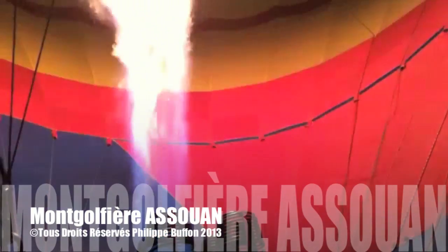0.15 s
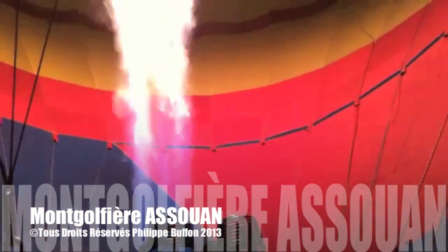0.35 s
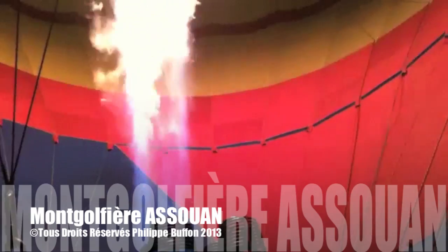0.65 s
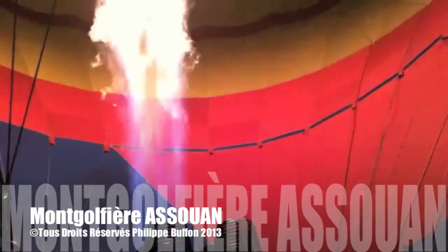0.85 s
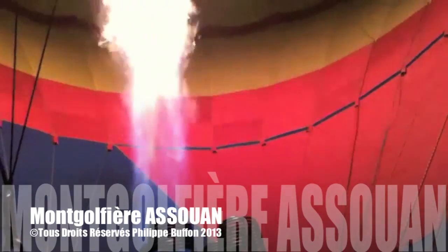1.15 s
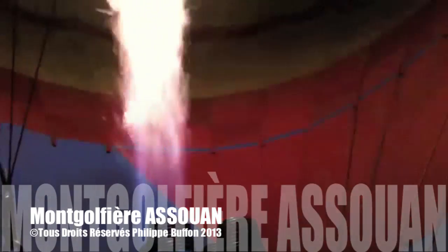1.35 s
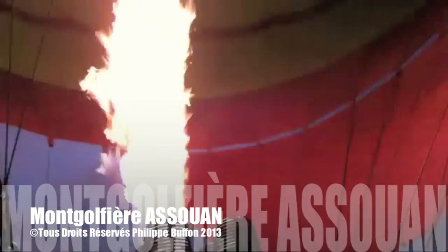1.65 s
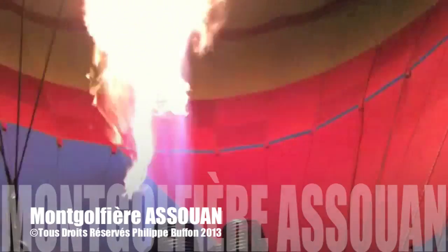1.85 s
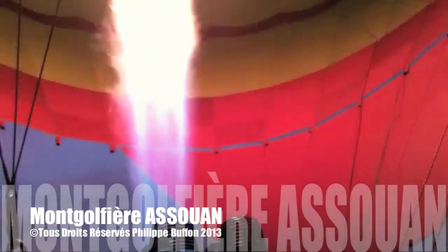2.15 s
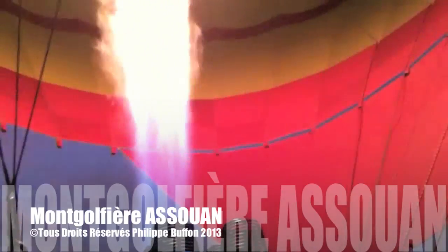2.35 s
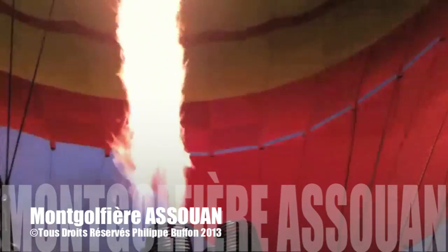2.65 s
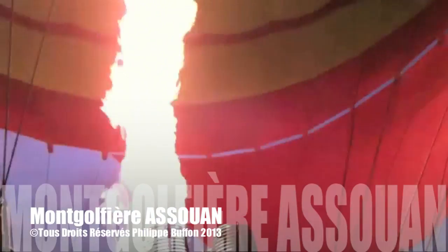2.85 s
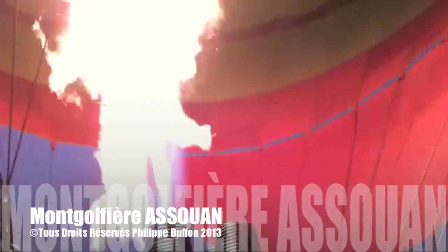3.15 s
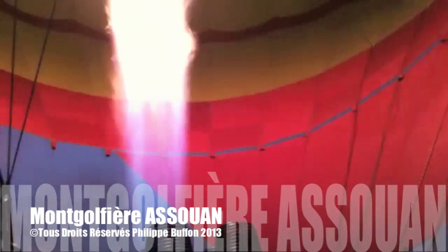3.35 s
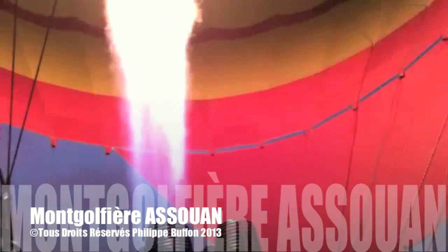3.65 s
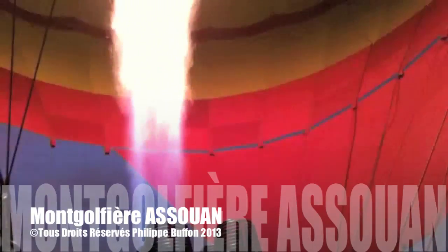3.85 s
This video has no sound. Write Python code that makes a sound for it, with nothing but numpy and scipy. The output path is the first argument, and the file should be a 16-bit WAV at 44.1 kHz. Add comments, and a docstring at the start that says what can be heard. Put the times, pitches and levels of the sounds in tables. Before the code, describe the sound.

Three long bursts of hissing gas and rushing, roaring flame from a balloon burner, each dying away with a short echo.

```python
"""In the basket of a hot air balloon, a propane burner fires three long blasts just overhead.
Gas hisses from the nozzles, the jets rush as they mix with air, and the flame roars as it burns unevenly.
Now and then a pocket of gas flares up with a puff. Between blasts the gas line empties,
the air inside the balloon rings on, and a lazy pilot flame keeps burning."""
import sys
import numpy as np
from scipy import signal
from scipy.fft import rfft, irfft, next_fast_len
from scipy.io import wavfile
from scipy.ndimage import uniform_filter1d

SR = 44100
rng = np.random.default_rng(int(sys.argv[2]) if len(sys.argv) > 2 else 0)


def generate_wav(sig):
    """Save sig (samples, or channels by samples) to the path in sys.argv[1] as 16-bit PCM at SR."""
    pcm = np.round(np.clip(np.atleast_2d(sig).T, -1, 1) * 32767).astype(np.int16)
    wavfile.write(sys.argv[1], SR, pcm)


N = 177326
TIME = np.arange(N) / SR

# Pulls on the gas valve; the first is already under way. Each sound adds its own trim to these levels.
# open_s, ease_s, shut_s, emptying_db_per_s, hiss_db, rush_db, roar_db
BLASTS = [(-0.22, 1.08, 1.344, 74, -20.5, -21, -19), (1.701, 2.18, 2.528, 88, -22.5, -20, -20),
          (3.004, 3.602, 3.923, 64, -21.5, -20.2, -19.5)]
# The tone of each noise, from low to high: pitch_hz, relative_level_db
HISS_TONE = [(1900, -29), (3200, -14), (3650, -8), (4250, -8), (4800, -9.5), (5900, -3), (6650, 0.5),
             (7400, -3), (8200, -2.5), (9000, -8), (10100, -3.5), (11600, -5.5), (12800, -14.5),
             (15600, -10.5)]
RUSH_TONE = [(260, -49), (450, -6.5), (485, -2.5), (628, 0.5), (767, -2.5), (834, -4.5), (906, -3),
             (953, -2.5), (1090, -5.5), (1570, -7.5), (1830, -6.5), (1980, -8.5), (2310, -4), (3300, -16),
             (4290, -45), (7260, -120)]
ROAR_TONE = [(30, -45), (55, -35), (80, -26.5), (100, -16.5), (125, -6.5), (157, 1), (195, -3.5),
             (245, 0.5), (285, -4), (375, -2.5), (420, -6), (460, -16), (650, -34), (1000, -80)]
PILOT_TONE = [(30, -32), (75, -25), (140, 1), (290, 1), (480, -28), (660, -5), (1250, -8.5), (1650, -10),
              (2000, -9), (3100, -22), (5200, -14.5), (6000, -21), (8500, -28), (15000, -49)]
# Narrow peaks and hollows in the hiss and the rush: pitch_hz, width_hz, boost_db
HISS_PEAKS_AND_DIPS = [(4200, 160, 1.5), (4690, 210, -5), (6300, 260, 1), (8870, 380, -8), (10026, 50, 1)]
RUSH_PEAKS_AND_DIPS = [(442, 21, -4.5), (837, 18, 3), (830, 27, 1.5), (1580, 74, -4.5), (1866, 140, 2.5)]
# How long the air inside the balloon takes to fade by 60 dB: pitch_hz, fade_s
ECHO_FADES = [(125, 0.73), (1000, 1), (4000, 0.52), (14000, 0.35)]
# Pockets of gas that flare up: start_s, peak_db (before the trim), rise_s
PUFFS = [(0.62, -12, 0.011), (0.82, 1, 0.0028), (0.925, -9.5, 0.0056), (1.001, -5, 0.0029),
         (1.966, -10, 0.006), (2.205, -2.5, 0.004), (3.255, -6, 0.0097), (3.71, -11.5, 0.0064)]

FILL_S, FILL_CURVE = 0.063, 2.76   # pressure builds in the gas line along an S-shaped rise
EASE_DB_PER_S = 14.5   # the flow sags while the hand relaxes


def from_db(db):
    """Turn decibels into a number to multiply a sound by."""
    return 10 ** (np.asarray(db) / 20)


def rms_one(x):
    """Scale a signal so that its average strength (rms) is 1."""
    return x / np.sqrt(np.mean(x ** 2) + 1e-20)


def at_hz(table, hz):
    """Look up a pitch in a table, sliding between rows octave by octave."""
    pitches_hz, values = np.transpose(table)
    return np.interp(np.log(np.maximum(hz, 1)), np.log(pitches_hz), values)


def coloured_noise(tone):
    """Noise whose lows and highs follow a tone table."""
    size = next_fast_len(N)
    gain = from_db(at_hz(tone, np.fft.rfftfreq(size, 1 / SR)))
    return rms_one(irfft(rfft(rng.standard_normal(size)) * gain, size)[:N])


def eddies(rate_hz):
    """Swirls in the gas: a random wobble, up to about rate_hz swings a second."""
    size = next_fast_len(N)
    hz = np.fft.rfftfreq(size, 1 / SR)
    gain = hz / (hz + rate_hz / 10) / (1 + (hz / rate_hz) ** 2)
    return rms_one(irfft(rfft(rng.standard_normal(size)) * gain, size)[:N])


def with_peaks_and_dips(x, bands):
    """Make narrow bands of a noise louder or softer."""
    for hz, width_hz, boost_db in bands:
        decay = np.exp(-np.pi * width_hz / SR)
        feedback = [1, -2 * decay * np.cos(2 * np.pi * hz / SR), decay ** 2]
        band = (1 - decay ** 2) / 2 * signal.lfilter([1, 0, -1], feedback, x)
        x = x + (from_db(boost_db) - 1) * band
    return rms_one(x)


def steady(x, over_s):
    """Even out a noise's slow swells and keep its quick grain."""
    size = max(int(over_s * SR), 256)
    return x / np.sqrt(uniform_filter1d(uniform_filter1d(x ** 2, size), size) + 1e-12)


def follow_valve(levels_db, lag_s, fall_share):
    """Level in dB of a sound fed by the gas: each blast builds, holds, sags and dies away."""
    gain = 1e-6
    now = TIME - lag_s
    for (open_s, ease_s, shut_s, emptying_db_per_s, *_), level_db in zip(BLASTS, levels_db):
        fill = (1 - np.exp(-np.maximum(now - open_s, 0) / FILL_S)) ** FILL_CURVE
        sag_db = EASE_DB_PER_S * np.clip(now - ease_s, 0, shut_s - ease_s)
        emptying_db = emptying_db_per_s * np.maximum(now - shut_s, 0)
        gain = gain + fill * from_db(level_db - fall_share * (sag_db + emptying_db))
    return 20 * np.log10(gain)


def nozzle_hiss(hiss_db, churn, trim_db=0.58, churn_db=0.54, sputter_db=0.37, dulling=0.13):
    """Escaping gas hisses; droplets make it sputter, and it dulls as the pressure falls."""
    hiss = with_peaks_and_dips(coloured_noise(HISS_TONE), HISS_PEAKS_AND_DIPS)
    body = signal.sosfiltfilt(signal.butter(2, 8500, fs=SR, output="sos"), hiss)
    treble = from_db(dulling * (hiss_db - np.percentile(hiss_db, 70))) * (hiss - body)
    wobble_db = churn_db * churn + sputter_db * eddies(rate_hz=33)
    return from_db(hiss_db + trim_db + wobble_db) * (body + treble)


def jet_rush(rush_db, hiss_db, churn, trim_db=0.05, churn_db=0.54, flutter_db=0.04, brightening=0.87):
    """The jets tear into the air inside the coil, fluttering quickly; more gas makes them brighter."""
    rush = steady(with_peaks_and_dips(coloured_noise(RUSH_TONE), RUSH_PEAKS_AND_DIPS), over_s=0.067)
    body = signal.sosfiltfilt(signal.butter(2, 1200, fs=SR, output="sos"), rush)
    treble = from_db(brightening * (hiss_db - rush_db)) * (rush - body)
    wobble_db = churn_db * churn + flutter_db * eddies(rate_hz=150)
    return from_db(rush_db + trim_db + wobble_db) * (body + treble)


def flame_roar(roar_db, churn, trim_db=-0.24, churn_db=0.64):
    """Uneven burning makes a low roar that swells with the big swirls."""
    roar = steady(coloured_noise(ROAR_TONE), over_s=0.077)
    return from_db(roar_db + trim_db + churn_db * churn) * roar


def pilot_flame(level_db=-46.5):
    """A lazy flame and its small jet burn softly the whole time."""
    return from_db(level_db) * coloured_noise(PILOT_TONE)


def balloon_echo(burner, level_db=-17.5, build_s=0.016):
    """Sound bounces around inside the fabric and blurs into an echo whose treble dies first."""
    age_s = TIME[:SR]
    edges_hz = np.geomspace(60, 18000, num=9)
    echo = 0
    for low, high in zip(edges_hz, edges_hz[1:]):
        band_filter = signal.butter(2, [low, high], "band", fs=SR, output="sos")
        band = signal.sosfilt(band_filter, rng.standard_normal(SR))
        fade_s = at_hz(ECHO_FADES, np.sqrt(low * high))
        echo = echo + band * np.exp(-np.log(1000) * age_s / fade_s)
    echo = echo * (1 - np.exp(-age_s / build_s))
    return from_db(level_db) * signal.fftconvolve(burner, echo / np.linalg.norm(echo))[:N]


def gas_puffs(trim_db=-10.5):
    """Each pocket of gas flares up all at once: a short, dull burst with no deep bass."""
    start_s, peak_db, rise_s = np.transpose(PUFFS)
    progress = np.maximum(TIME - start_s[:, None], 0) / rise_s[:, None]   # 1 at each puff's peak
    swell = from_db(peak_db + trim_db) @ (progress * np.exp(1 - progress))
    dull_noise = coloured_noise([(70, -37), (170, 7.0), (400, -0.5), (900, -7.0), (2500, -42)])
    bursts = swell * steady(dull_noise, over_s=256 / SR)
    return signal.sosfilt(signal.butter(4, 120, "high", fs=SR, output="sos"), bursts)


def scene():
    """The burner overhead, its pilot flame and its echo, the same in both ears."""
    *_, hiss_levels, rush_levels, roar_levels = np.transpose(BLASTS)
    hiss_db = follow_valve(hiss_levels, lag_s=0, fall_share=1)
    # The fire answers the gas a little late and fades less steeply.
    rush_db = follow_valve(rush_levels, lag_s=0.012, fall_share=0.81)
    roar_db = follow_valve(roar_levels, lag_s=0.016, fall_share=0.77)
    churn = eddies(rate_hz=17)   # the same big swirls shake the flame and the jets
    burner = (flame_roar(roar_db, churn) + jet_rush(rush_db, hiss_db, churn)
              + nozzle_hiss(hiss_db, churn) + gas_puffs())
    return np.tile(burner + pilot_flame() + balloon_echo(burner), (2, 1))


def record(dry):
    """Cut the very highest treble off steeply."""
    cutoff_hz = 15720
    return signal.sosfilt(signal.ellip(12, .1, 80, cutoff_hz, fs=SR, output="sos"), dry)


dry = scene()
out = record(dry)
generate_wav(out)
```